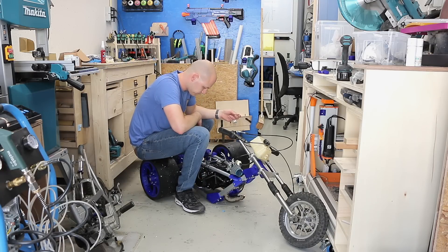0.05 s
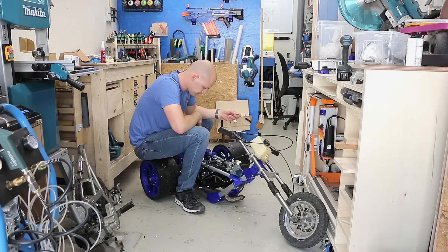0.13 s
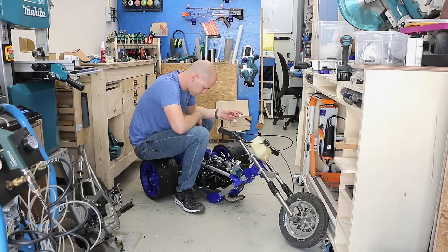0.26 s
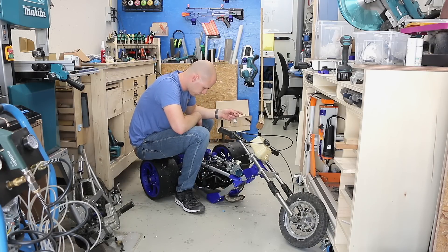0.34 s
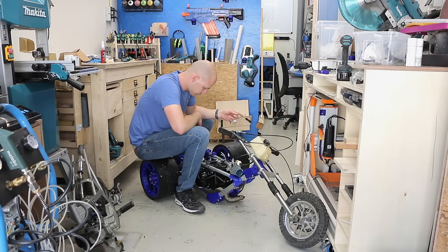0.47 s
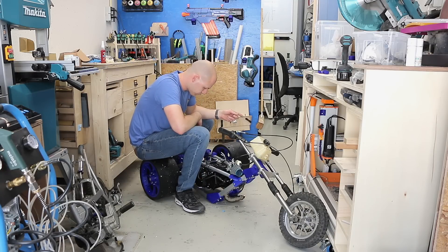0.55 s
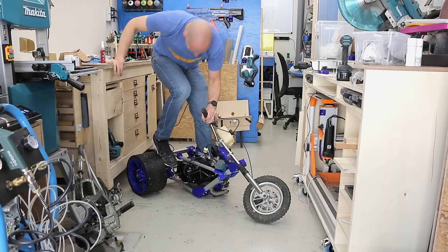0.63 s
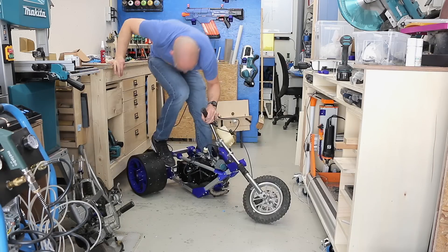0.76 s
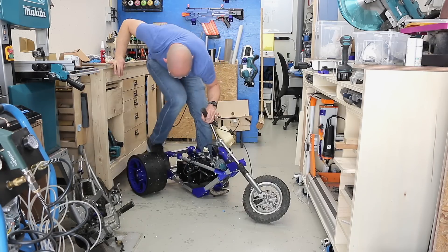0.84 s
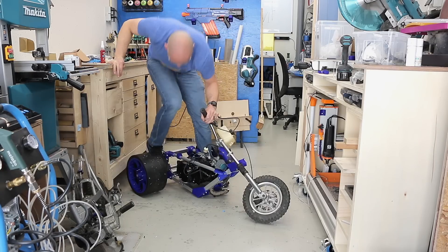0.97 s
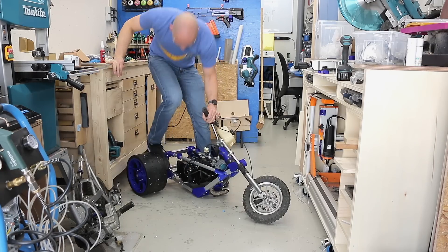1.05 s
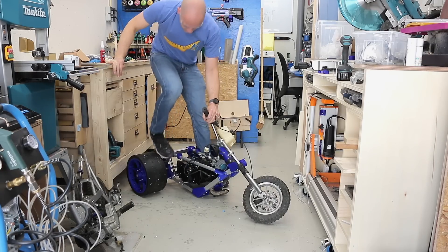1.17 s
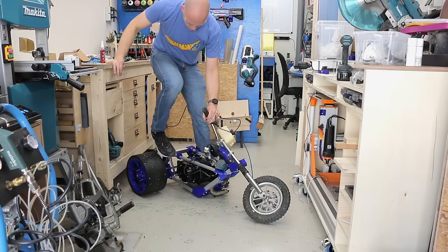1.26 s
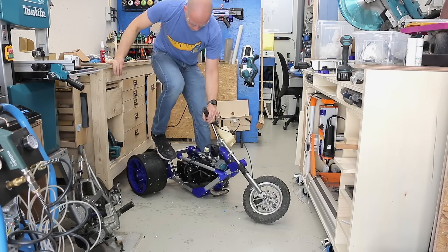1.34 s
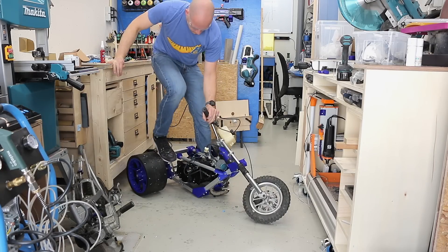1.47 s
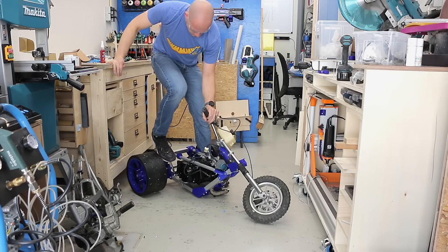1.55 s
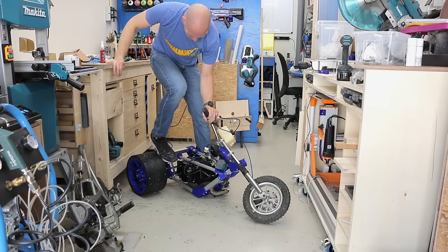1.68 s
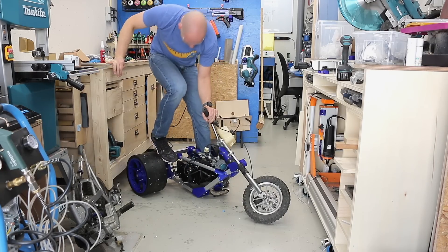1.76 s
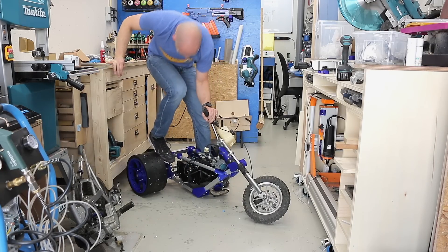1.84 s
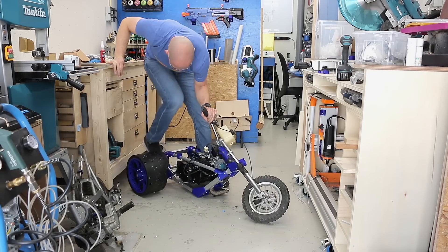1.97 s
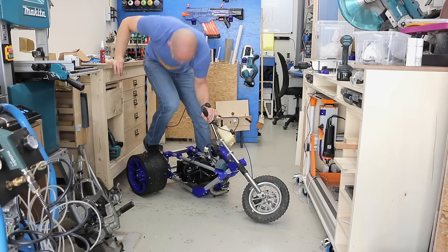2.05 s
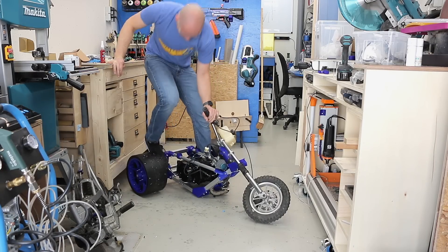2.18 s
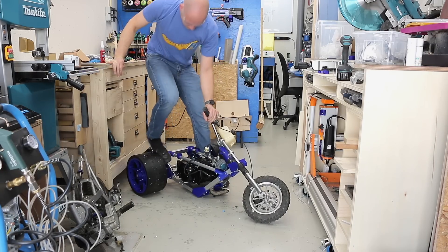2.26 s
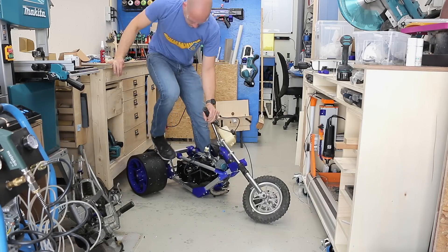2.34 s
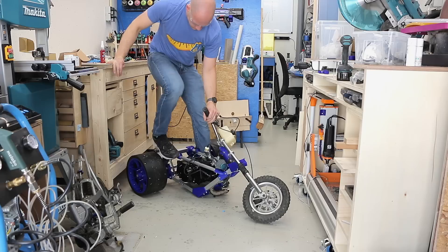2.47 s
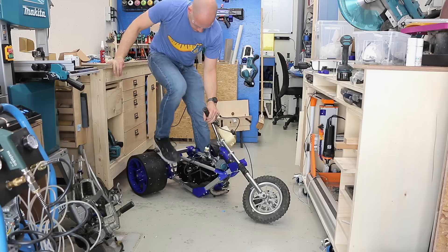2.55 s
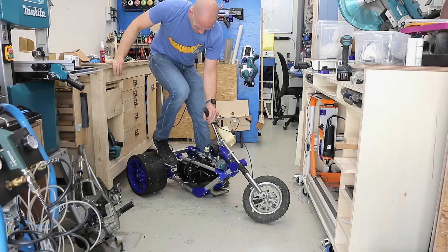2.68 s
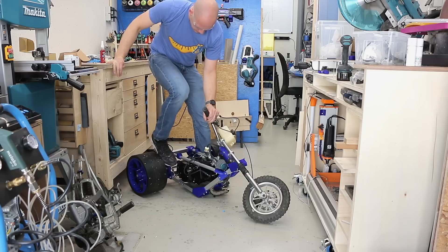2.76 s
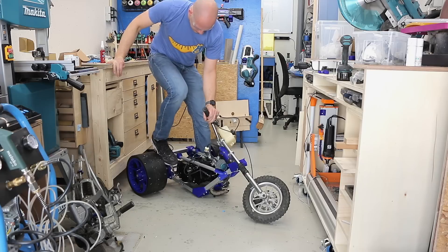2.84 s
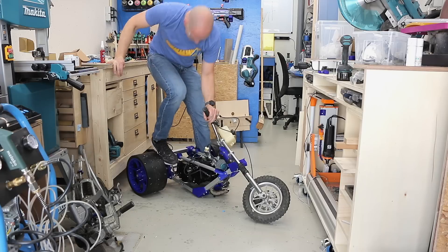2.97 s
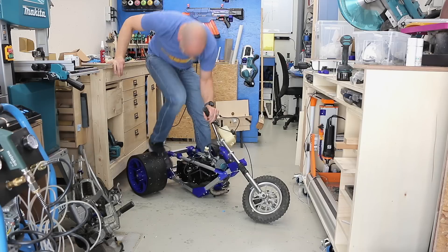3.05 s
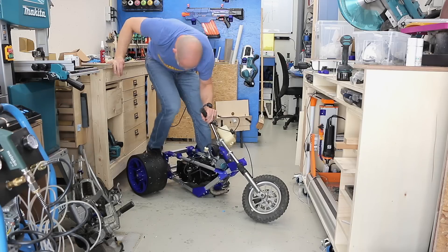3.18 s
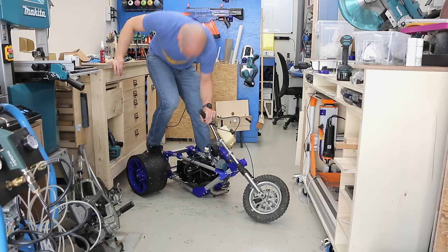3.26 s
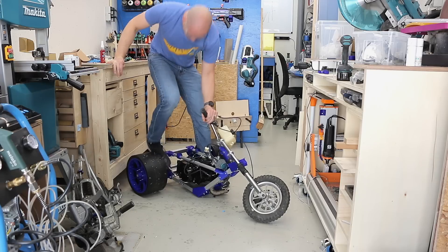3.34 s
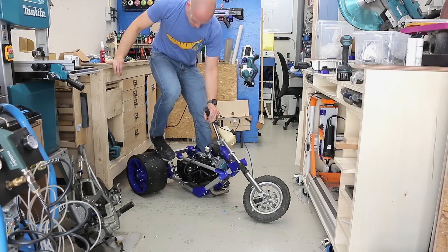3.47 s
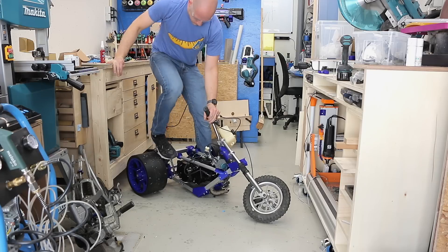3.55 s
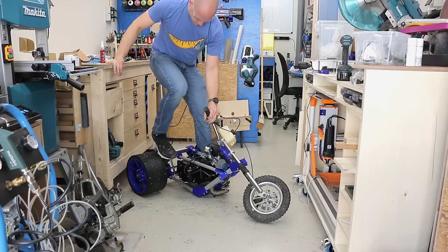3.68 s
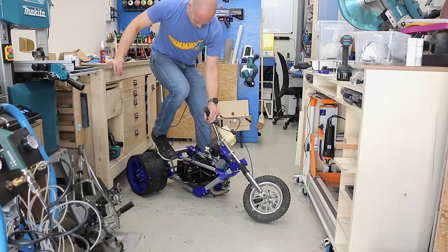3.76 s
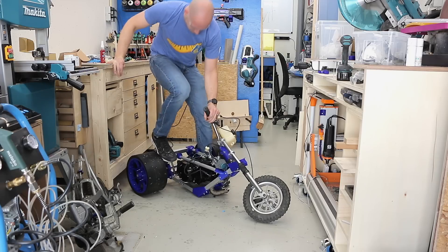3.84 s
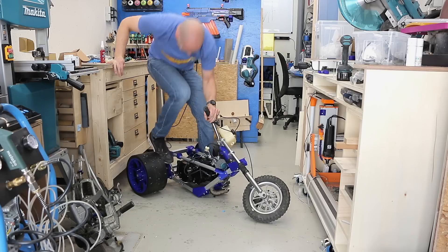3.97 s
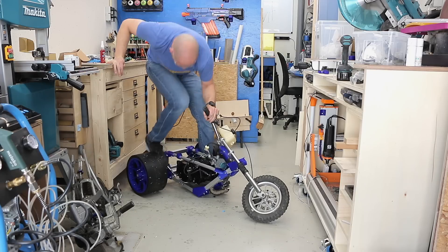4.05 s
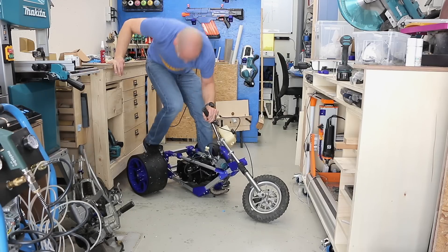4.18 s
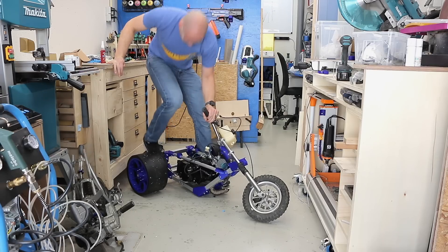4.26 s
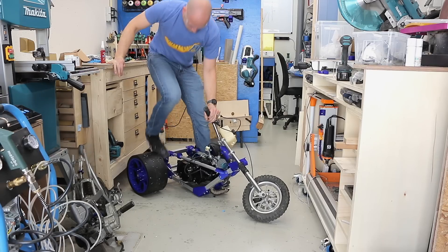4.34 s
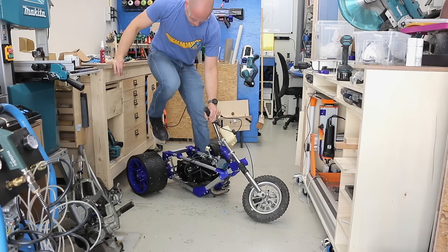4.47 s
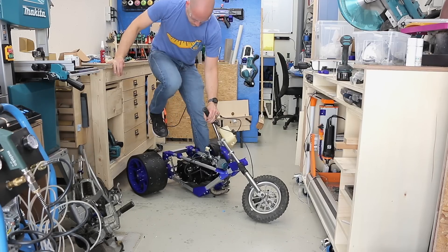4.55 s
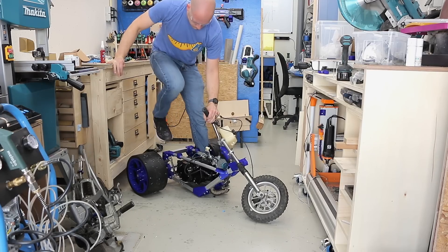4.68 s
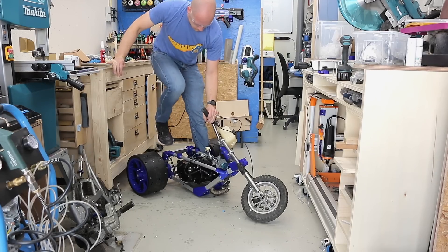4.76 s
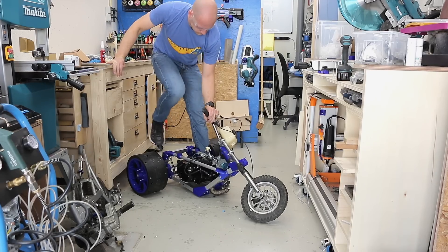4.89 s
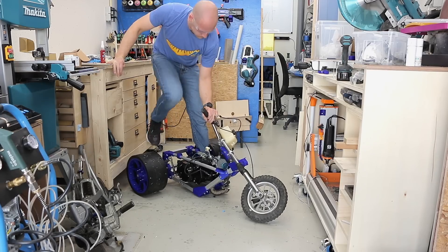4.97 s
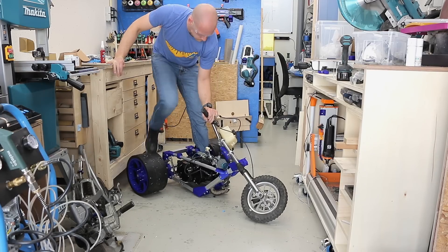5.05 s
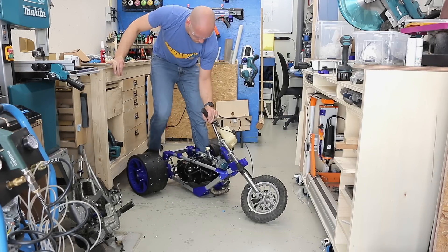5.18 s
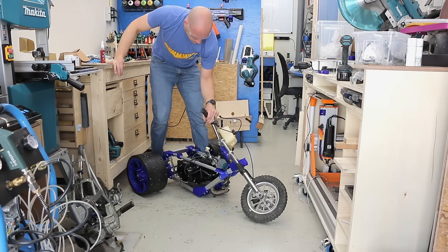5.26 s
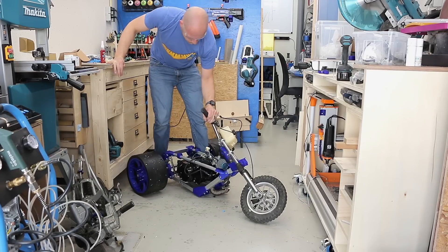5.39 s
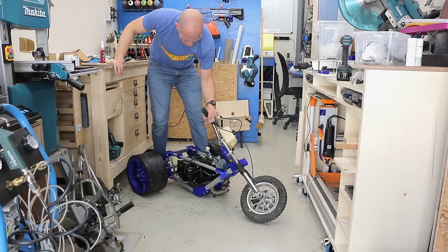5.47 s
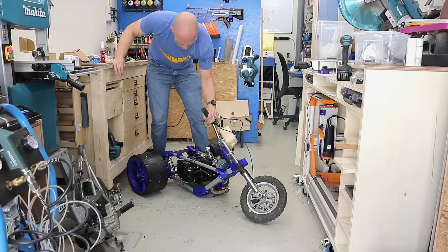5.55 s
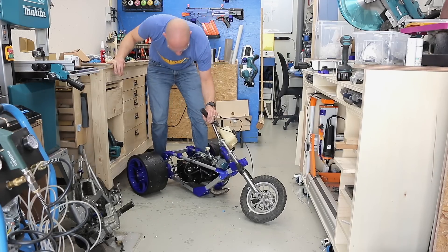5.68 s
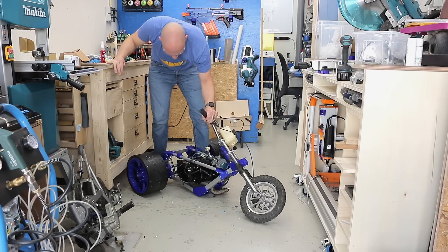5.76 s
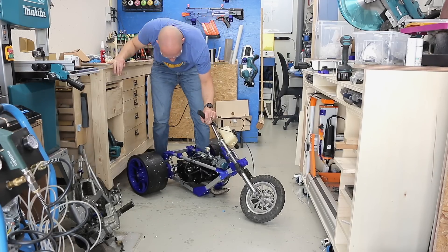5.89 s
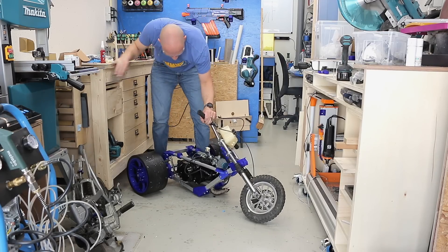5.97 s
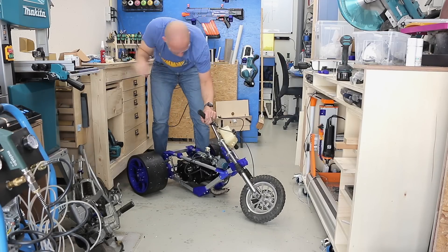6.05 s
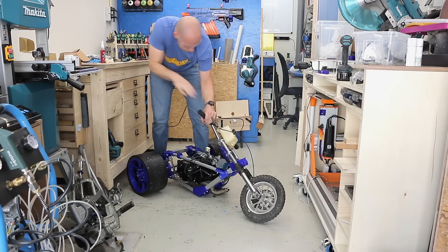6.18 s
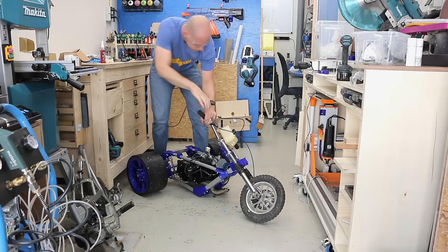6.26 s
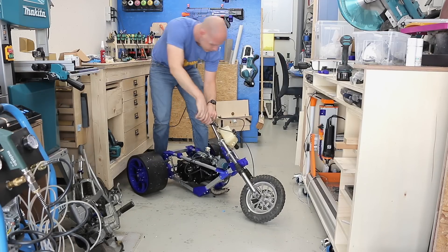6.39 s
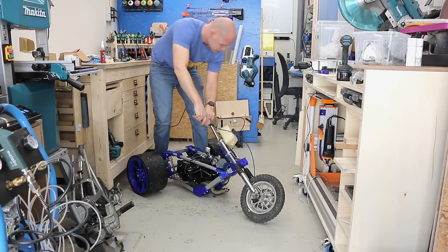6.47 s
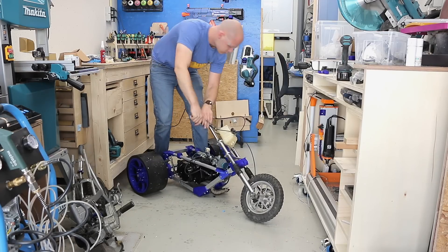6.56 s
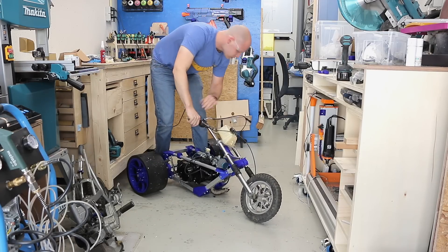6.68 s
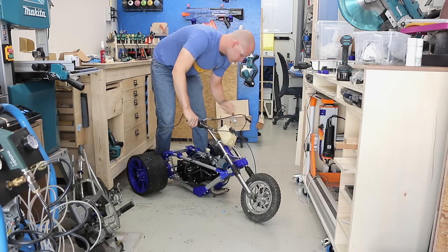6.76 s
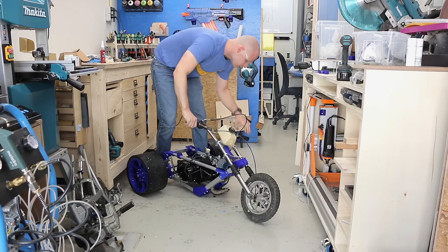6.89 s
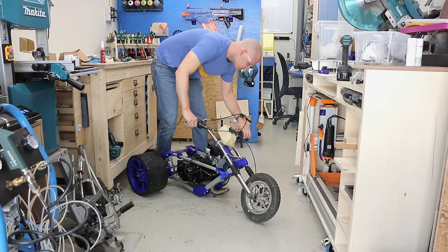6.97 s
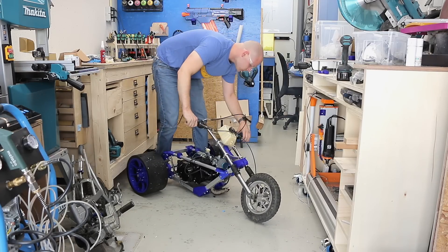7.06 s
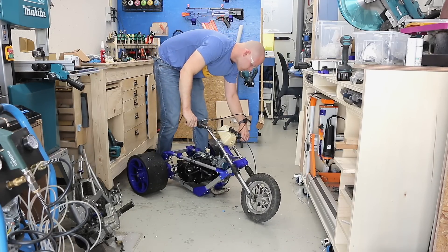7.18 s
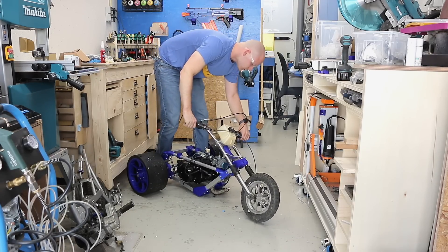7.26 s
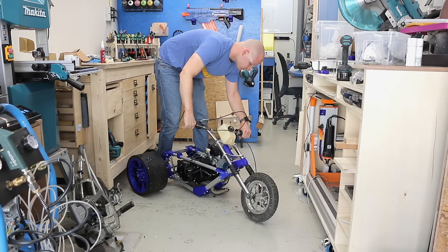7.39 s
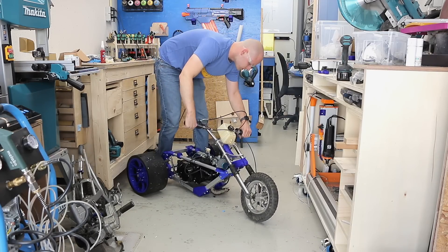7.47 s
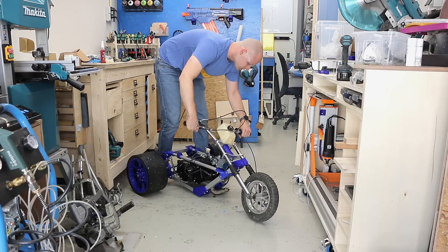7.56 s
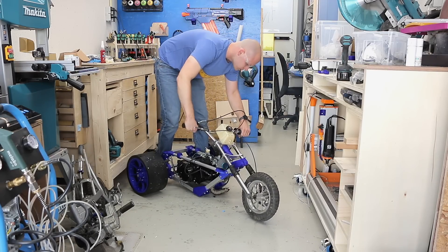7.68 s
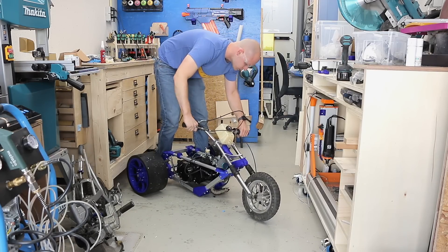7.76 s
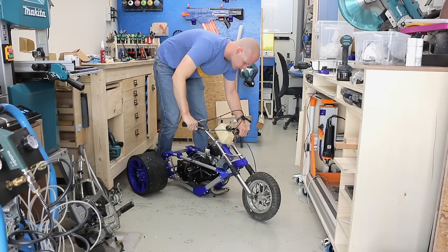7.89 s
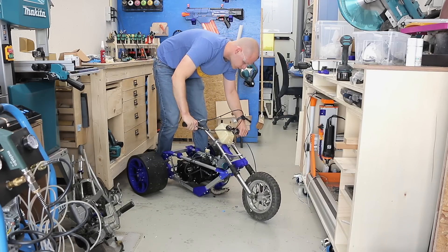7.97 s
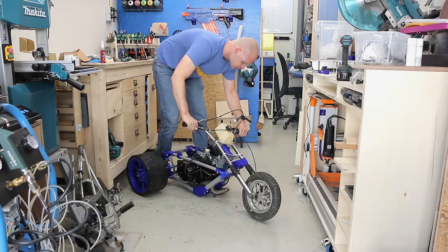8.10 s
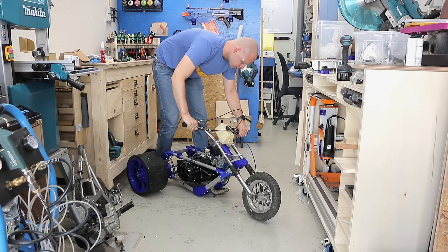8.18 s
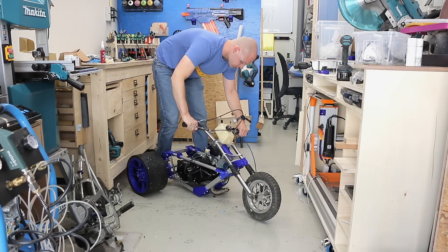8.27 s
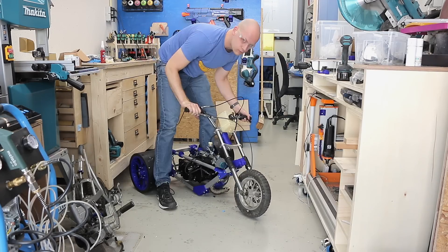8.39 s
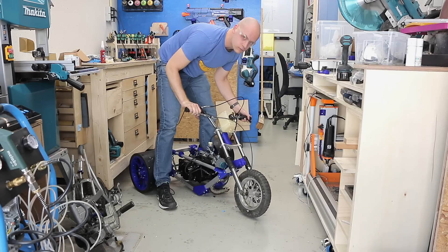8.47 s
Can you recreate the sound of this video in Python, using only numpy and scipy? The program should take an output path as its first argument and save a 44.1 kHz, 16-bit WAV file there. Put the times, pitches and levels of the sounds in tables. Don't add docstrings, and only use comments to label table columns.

```python
import sys
import numpy as np
from scipy import signal
from scipy.fft import rfft, irfft
from scipy.io import wavfile
from scipy.ndimage import uniform_filter1d

SR = 44100
rng = np.random.default_rng(int(sys.argv[2]) if len(sys.argv) > 2 else 0)


def persist_wave(psi):
    counts = np.round(np.clip(psi, -1, 1) * 32767).astype(np.int16)
    wavfile.write(sys.argv[1], SR, np.atleast_2d(counts).T)


def decibels_to_gain(level_db):
    exponent = np.asarray(level_db, float) / 20
    return 10 ** exponent


N = 376173
TIME = np.arange(N) / SR

# pitch_hz, level_db, t60_s
FRAME = [(781, 3, .18), (1008, 3, .3), (1147, 4, .28), (1440, -0.5, .28), (1580, 9, .25), (1700, 6.5, .27),
         (1853, 6.5, .21), (2200, 3, .24), (2965, -14, .2)]
# pitch_hz, width_hz, level_db
BRIGHT = [(4600, 250, -3), (5450, 190, -5), (6860, 230, -1), (7500, 200, -2), (8150, 350, -3.5),
          (9000, 500, -3), (12000, 6000, -15)]
# peak_s, gear_rattle_db, intake_rush_db, valve_hiss_db, rush_centre_hz
SWINGS = [(.91, -55, -43, -46, 3146), (.986, -14, -17, -32.5, 3236), (1.03, -35, -20.5, -27.5, 3941),
          (1.095, -26.5, -24.5, -29, 3820), (1.183, -41, -16, -23, 3957), (1.259, -17.5, -25, -34, 3620),
          (2.035, -29, -33.5, -49.5, 2875), (2.116, -17, -15.5, -46, 3136), (2.2, -28, -21, -33.5, 3210),
          (2.301, -27.5, -26.5, -28, 3606), (2.428, -25.5, -29.5, -35.5, 3088), (3.15, -35, -29, -56, 3775),
          (3.232, -15.5, -19, -50.5, 3187), (3.293, -19.5, -18.5, -27, 3443),
          (3.4, -28.5, -28.5, -34.5, 3450), (3.563, -22.5, -32, -44, 3214), (4.05, -47, -46, -90, 3450),
          (4.13, -39, -34, -51, 3820), (4.19, -30, -24.5, -49, 3130), (4.24, -20.5, -19.5, -24, 3460),
          (4.297, -24.5, -19, -34.5, 4010), (4.36, -35, -25.5, -22.5, 3850)]
# shut_s, reopened_s, rasp_loss_db, hiss_filter_steps_down
SHUTS = [
    (4.622, 4.898, -13.5, 0.32),
    (5.3, 5.627, -3, 0.21),
    (6.341, 6.732, -10.5, 0.86),
    (7.387, 7.881, -12, 3.5),
    (7.584, 7.79, -5.5, 0),
    (4.89, 5.097, 1, -1),
]


def in_time(spans, quiet):
    out = np.outer(quiet, np.ones(N))
    for rows in spans:
        s, *columns = np.transpose(rows)
        on = (TIME >= s[0]) & (TIME <= s[-1])
        out[:, on] = [np.interp(TIME[on], s, c) for c in columns]
    return out


def rms_one(x):
    return x / np.sqrt(np.mean(x ** 2) + 1e-20)


def at_hz(points, hz):
    points_hz, values = np.transpose(points)
    return np.interp(np.log(hz + 1), np.log(points_hz), values)


def band(x, low_hz, high_hz):
    return rms_one(signal.sosfilt(signal.butter(2, [low_hz, high_hz], "band", fs=SR, output="sos"), x))


def resonate(x, peaks):
    out = 0
    for k, (hz, width_hz, db) in enumerate(peaks):
        r = np.exp(-np.pi * abs(width_hz) / SR)
        poles = [1, -2 * r * np.cos(2 * np.pi * hz / SR), r * r]
        ring = signal.lfilter([(1 - r * r) / 2, 0, (r * r - 1) / 2], poles, x + 1e-18)
        out = out + (-1) ** k * decibels_to_gain(db) * ring
    return out


def grains(per_s, spread_db):
    size = decibels_to_gain(spread_db * np.minimum(rng.exponential(1, N), 5))
    return (rng.random(N) < per_s / SR) * rng.choice([-1, 1], N) * size


def coloured(spectrum):
    gain = decibels_to_gain(at_hz(spectrum, np.fft.rfftfreq(N, 1 / SR)))
    return rms_one(irfft(rfft(rng.standard_normal(N)) * gain, N))


def swells(s, db, rise_db_per_s, fall_db_per_s):
    late = TIME[::32] - np.array(s)[:, None]
    level = np.array(db)[:, None] - np.where(late < 0, -rise_db_per_s, fall_db_per_s) * late
    return np.interp(TIME, TIME[::32], decibels_to_gain(level.max(axis=0)))


def shutting(depths, sink_s, lag_s=0):
    reopen_s = 0.015
    out = np.zeros(N)
    for (shut, opened, *_), depth in zip(SHUTS, depths):
        sunk = 1 - np.exp(-np.maximum(TIME - shut - lag_s, 0) / sink_s)
        out += depth * sunk * np.clip((opened - TIME) / reopen_s + 1, 0, 1)
    return out


def room(x, wet_db):
    # pitch_hz, t60_s
    room_t60 = [(200, 0.35), (1000, 0.24), (4000, 0.05), (12000, 0.049)]
    t, tail = TIME[:SR // 2], 0
    for hz in np.geomspace(80, 14000, num=9):
        octave = band(rng.standard_normal(len(t)), hz / 1.38, hz * 1.38)
        tail = tail + octave * np.sqrt(hz) * decibels_to_gain(-60 * t / at_hz(room_t60, hz))
    tail = tail * np.minimum(t / 0.0067, 1)
    return x + decibels_to_gain(wet_db) * signal.fftconvolve(x, tail / np.sqrt(np.sum(tail ** 2)))[:N]


def ventilation():
    # pitch_hz, level_db
    vent = [(15, -40), (25, -10), (60, 8.5), (174, -5), (219, -2), (756, -14), (930, -15.5), (1970, -24),
            (12000, -49), (15600, -88), (22000, -120)]
    return decibels_to_gain(-43.5) * coloured(vent)


def workshop():
    # pitch_hz, level_db
    shop = [(35, -31.5), (60, -24.5), (139, 1.5), (712, -3), (5220, -19), (5670, -15.5), (6170, -18.5),
            (7150, -19), (9000, -23), (11700, -44.5), (19800, -120)]
    shop_db = -62
    rumble = decibels_to_gain(shop_db + 1.5) * band(rng.standard_normal(N), 25, 82)
    return decibels_to_gain(shop_db) * coloured(shop) + rumble


def squeaks():
    # start_s, pitch_hz, width_hz, level_db, length_s
    spring = [(0.69, 4300, 700, -60, 0.3), (0.695, 600, 250, -65, 0.06), (1.563, 4270, 700, -60, 0.06),
              (1.84, 7100, 150, -67, 0.09), (3.955, 4300, 600, -58, 0.05), (2.815, 7150, 150, -59, 0.13),
              (2.866, 5550, 150, -59, 0.1), (2.718, 4350, 700, -51, 0.045), (2.832, 7600, 300, -64, 0.04),
              (2.59, 6900, 600, -73, 0.15), (3.075, 3400, 300, -58, 0.07)]
    out, t = np.zeros(N), TIME[:SR // 4]
    for s, hz, width_hz, db, length in spring:
        swell = 3 * t / length * np.exp(1 - 3 * t / length)
        rub = resonate(rng.standard_normal(len(t)), [(hz, width_hz, 0)])
        whistle = rms_one(resonate(rub, [(hz, width_hz, 0)]))
        out[round(s * SR):][:len(t)] += decibels_to_gain(db) * swell * whistle
    return out


def knocks():
    # start_s, peak_db, thud_db, pitch_hz
    slams = [(0.898, -26, -43, 760), (0.936, -5, -24, 1030), (1.086, -16, -41.5, 830),
             (1.249, -1, -20.5, 1500), (1.991, -28.5, -40, 827), (2.102, -8.5, -47.5, 965),
             (2.422, -6, -37, 970), (3.129, -19.5, -34, 1760), (3.19, -12.5, -20.5, 1147),
             (3.212, -6, -28, 1048), (3.553, -5.5, -25.5, 980), (4.115, -29, -45, 2460),
             (4.148, -20.5, -39, 920)]
    # start_s, peak_db, tick_db, pitch_hz
    clicks = [(0.825, -34, -55.5, 1554), (1.032, -13, -9, 2060), (1.089, -17, -11, 2110),
              (1.172, -23.5, -8, 1840), (1.244, -46, -7.5, 1750), (2.069, -19, -21, 1130),
              (2.147, -14.5, -4.5, 1020), (2.182, -20, -6.5, 2230), (2.226, -17, -8.5, 1010),
              (2.269, -21, -7, 2200), (2.302, -24, -23, 1960), (2.417, -15.5, -32.5, 1780),
              (2.053, -22, -33.5, 2530), (2.427, -13, -35.5, 1000), (1.259, -10, -25, 1560),
              (3.176, -18, -26, 935), (3.119, -30, -34, 3430), (0.875, -33, -56.5, 1640),
              (0.966, -13, -45, 3170), (1.165, -24, -25, 4000), (3.294, -19.5, -28.5, 2320),
              (3.333, -18, -12, 2210), (3.386, -20, -28.5, 880), (3.484, -21.5, -35, 600),
              (3.541, -42, -26.5, 2200), (1.182, -21, -14.5, 4000), (2.027, -38, -34.5, 2000),
              (2.092, -12.5, -17, 3200), (2.406, -40, -22, 4200), (3.111, -47, -27.5, 3400),
              (3.401, -26, -22, 3400), (4.199, -14, -20, 3200), (4.227, -23, -10, 3500)]
    # start_s, peak_db, thud_db, pitch_hz
    taps = [(1.449, -31, -33.5, 1010), (1.572, -45, -62, 2190), (1.587, -44, -42.5, 555),
            (1.717, -27, -43.5, 960), (1.916, -40, -43, 650), (2.716, -45, -46, 2240),
            (2.722, -38, -43, 660), (3.773, -47.5, -57.5, 690), (3.995, -38.5, -69, 2190),
            (4.04, -36, -47, 2270)]
    # start_s, clank_db, thud_db, tick_db, t60_s, pitch_hz
    blows = [(s, db, thud, db - 24, 0.22, hz) for s, db, thud, hz in slams]
    blows += [(s, db, db - 18, tick, 0.18, hz) for s, db, tick, hz in clicks]
    blows += [(s, db, thud, db - 30, 0.13, hz) for s, db, thud, hz in taps]
    clank_top = signal.butter(2, 4800, fs=SR, output="sos")
    out, t = np.zeros(N + SR), TIME[:SR // 3]
    for s, db, thud_db, tick_db, t60, centre_hz in blows:
        rattle = rng.standard_normal((3, len(t))) * (decibels_to_gain(-60 * t / t60) + np.exp(-t / 0.0032))
        modes = [(hz, 90, d + rng.normal(0, 3)) for hz, d, ring_s in FRAME]
        clank = resonate(rattle[0], modes + [(centre_hz, 300, 9), (3900, 1400, -16)])
        clank = signal.sosfilt(clank_top, clank)
        hollow_hz = 455 * (1 + 0.099 * rng.normal())
        thud = resonate(rattle[1], [(hollow_hz, 70, 13.5), (332, 80, -9.5), (665, 83, -35.5), (90, 31, 8)])
        sharp = rattle[2] * (np.exp(-t / 0.003) + 0.25 * np.exp(-t / 0.035))
        tick = resonate(sharp, [(hz, w, d + rng.normal(0, 4)) for hz, w, d in BRIGHT])
        for peak_db, part in [(db - 3.5, clank), (thud_db + 4.0, thud), (tick_db - 11.5, tick)]:
            out[round(s * SR):][:len(t)] += decibels_to_gain(peak_db) * part / np.abs(part).max()
    return out[:N]


def strokes(column, offset_db, fall_db_per_s):
    # start_s, gear_rattle_db, intake_rush_db, valve_hiss_db
    jolt_rows = [(.83, -59, -44.5, -57.5), (0.869, -48.5, -54.5, -46), (1.45, -30, -38, -43.5),
                 (1.721, -45, -68, -86.5), (1.917, -44, -38, -57), (1.995, -52.5, -57.5, -48),
                 (2.712, -53.5, -42, -50), (3.125, -37, -26.5, -48.5), (3.452, -27.5, -30.5, -52),
                 (3.529, -37.5, -32, -45), (4.0, -60, -39.5, -81), (1.172, -30, -22, -31),
                 (2.069, -25.5, -28, -45.5), (3.19, -18, -29, -45), (3.211, -17.5, -17, -38),
                 (4.149, -26, -44, -46), (3.772, -56, -58, -70)]
    swings, jolts = np.transpose(SWINGS), np.transpose(jolt_rows)
    swung = swells(swings[0], swings[column], 587.5, fall_db_per_s)
    jolted = swells(jolts[0], jolts[column], 5998, fall_db_per_s)
    return decibels_to_gain(offset_db) * np.maximum(swung, jolted)


def kicks():
    # pitch_hz, width_hz, level_db
    pipe = [(67.5, 110, 0.5), (150, 23, 7.5), (198, 25, 6.5), (270, 13, 11), (348, 870, -1.5)]
    # peak_s, peak_db
    puffs = [(.938, -23), (.986, -24), (1.09, -15.5), (1.259, -31.5), (1.45, -44), (1.601, -56),
             (1.738, -62), (1.926, -50), (2.065, -33.5), (2.162, -27), (2.344, -21), (2.428, -45),
             (2.72, -66), (3.128, -44.5), (3.223, -15.5), (3.254, -29.5), (3.401, -19.5), (3.564, -29),
             (4.146, -33), (4.26, -11.5), (4.36, -14.5)]
    # peak_s, peak_db
    booms = [
        (.96, -30),
        (1.29, -31.5),
        (1.75, -48),
        (2.165, -24),
        (3.245, -24),
        (3.42, -51.5),
        (3.6, -42),
    ]
    rise_db_per_s, fall_db_per_s = 701, 222.5
    puff = band(resonate(grains(900, spread_db=3.5), pipe), 49, 420)
    boom = rms_one(resonate(puff, [(148, 26, 0)]))
    air = swells(*np.transpose(booms), rise_db_per_s, fall_db_per_s) * boom
    air += swells(*np.transpose(puffs), rise_db_per_s, fall_db_per_s) * decibels_to_gain(-5.5) * puff

    frame = [(650, 95, -9.5)] + [(hz, 170, db / 2) for hz, db, t60 in FRAME]
    gears = band(resonate(grains(2500, spread_db=4.0), frame), 450, 2000)
    gears *= strokes(column=1, offset_db=-4.0, fall_db_per_s=249)

    rush_hz = np.interp(TIME, *np.transpose(SWINGS)[::4])
    wobble = rms_one(signal.lfilter([1], np.poly([.94, .94]), rng.standard_normal((2, N))))
    turn = 2 * np.pi * np.cumsum(rush_hz) / SR
    draw = strokes(column=2, offset_db=6.0, fall_db_per_s=190)
    whistle = wobble[0] * np.cos(turn) + wobble[1] * np.sin(turn)
    whistle *= (draw / draw.max()) ** 0.29
    rush = 0.4 * whistle + 0.27 * band(grains(4000, spread_db=1.5), 1900, 4600)

    hiss = rms_one(resonate(grains(5000, spread_db=3.0), BRIGHT))
    hiss *= strokes(column=3, offset_db=-5.0, fall_db_per_s=266)
    return air + gears + draw * rush + hiss


def silencer(hz):
    # pitch_hz, width_hz, level_db
    waves = [(150, 25, -6.5), (206.4, 32, 2.5), (270, 47.6, -0.5), (313.7, 40, -1.5), (361, 32, 3),
             (415, 30, -12), (460, 35, -9.5), (548, 99, -2), (622, 42, -7), (825, 92, -21.5),
             (897, 130, -6)]
    # pitch_hz, width_hz, depth (0-1)
    nulls = [(173.8, 18, 1), (231.4, 27, 0.6), (392, 31, 0.6)]
    gain = decibels_to_gain(-22)
    for centre_hz, width_hz, db in waves:
        gain = gain + decibels_to_gain(db) / (1 + (2 * (hz - centre_hz) / width_hz) ** 4) ** .5
    for centre_hz, width_hz, depth in nulls:
        gain = gain * (1 - depth / (1 + (2 * (hz - centre_hz) / width_hz) ** 2))
    return gain


def engine():
    # time_s, firings_per_s
    speed = [(4.2, 21), (4.86, 21), (4.93, 39.5), (5.05, 42.4), (5.18, 40), (5.33, 43.3), (5.51, 39.7),
             (5.77, 39.5), (6.08, 48.5), (6.22, 51.6), (6.35, 52.4), (6.705, 36.4), (7.08, 51.2),
             (7.26, 54.5), (7.42, 55.9), (7.858, 34.4), (8.13, 51), (8.344, 57.2)]
    # time_s, firings_per_s
    full_speed = [
        (8.344, 89.9),
        (8.54, 89.9),
    ]
    # time_s, exhaust_db
    exhaust = [(4.2, -45.5), (4.244, -29), (4.326, -49.5), (4.385, -21.5), (4.4, -9.5), (4.466, -9.5),
               (4.62, -13.5), (4.66, -24), (4.8, -20.5), (4.83, -28), (4.89, -32.5), (4.94, -17.5),
               (6.7, -15.5), (7.4, -15.5), (7.5, -8), (7.89, -10), (8.0, -14), (8.343, -1.5)]
    # time_s, exhaust_db, rasp_db
    full_revs = [
        (8.344, 6, -27),
        (8.54, -25, -28),
    ]
    # multiple of the firing rate, revving_db, full_revs_db
    orders = [(1, -5, -16), (2, -5.5, -18), (3, -4, -6.5), (4, -2.5, -13.5), (5, 0, -12.5), (6, 2, -4.5),
              (7, 1, 4), (8, -2.5, -6), (9, -6, -9), (10, 0.5, -3), (11, 1, -18.5), (12, -3.5, -9.5),
              (13, -4, -13), (14, -6.5, -16.5), (15, -8, -9.5), (16, -3, -7.5), (17, -6.5, -19.5),
              (18, -3, -24.5), (19, -7, -15), (20, -6, -9)]
    # pitch_hz, width_hz, level_db
    rasp_peaks = [(1020, 424, 4.5), (2440, 940, 1.5), (3820, 1210, 2.5), (8800, 23000, -15)]
    per_s, = in_time([speed, full_speed], [30])
    level_db, = in_time([exhaust, [row[:2] for row in full_revs]], [-130])
    full = TIME > full_speed[0][0]
    over_db = np.interp(TIME, [4.93, 4.98], [6, 15])
    cycle = np.cumsum(per_s) / SR
    luck = rng.standard_normal((400, len(orders) + 2))

    rasp_db = -26.5 + 0.37 * (np.maximum(per_s, 36) - 45)
    rasp_db += shutting([row[2] for row in SHUTS], sink_s=0.061)
    rasp_db += np.clip(np.where(TIME < 4.9, -10, -18) - level_db, 0, 16)
    rasp_db = np.where(full, in_time([full_revs], [0, 0])[1], rasp_db)
    throttle = decibels_to_gain(-5.0 + 0.78 * (rasp_db + 24.5))

    cold = np.interp(TIME, [5.5, 5.7], [2.5, 1])
    late = 0.035 * (cold - .8) / 1.7
    turn = cycle + late * np.interp(cycle, np.arange(400), luck[:, -2])

    upper_db = -15.5 * shutting([0.2, 0.077, 0.63, 0.88, 0.1, 0.14], sink_s=0.0091, lag_s=0.062)[::16]
    top_db = 0.2 * (per_s[::16] - 53)
    chill_db = -6 * np.interp(TIME[::16], [5.05, 5.15], [1, 0])
    note = 0
    for k, (multiple, db, full_db) in enumerate(orders):
        chance = np.interp(cycle, np.arange(400), luck[:, k] + 0.13 * luck[:, -1])
        uneven = 1.52 * np.where(full, .4, cold) * chance
        hz = multiple * per_s[::16]
        box_db = db + upper_db * np.clip((hz - 314.5) / 40, 0, 1)
        box_db = box_db + top_db * (hz > 435) + chill_db * (abs(hz - 275) < 40)
        box = np.repeat(silencer(hz) * decibels_to_gain(box_db), 16)[:N]
        sweep = -0.85 * k * k
        wave = np.sin(2 * np.pi * multiple * turn + sweep + 0.14 * uneven)
        note = note + np.where(full, decibels_to_gain(full_db), box) * decibels_to_gain(uneven) * wave

    gate = 0.12
    firing = cycle.astype(int)
    shifted = cycle + 0.57 * luck[firing, -2]
    burst = (1 - gate + gate * np.cos(np.pi * shifted) ** 2) * decibels_to_gain(1.3 * luck[firing, -1])
    rasp = rms_one(resonate(rng.standard_normal(N), rasp_peaks) * burst)
    clatter = band(grains(3100, spread_db=-4.5), 650, 4000)
    return decibels_to_gain(level_db + over_db) * (rms_one(note) + throttle * rasp + decibels_to_gain(-35.5) * clatter)


def coughs():
    # start_s, peak_db, pitch_hz, length_s, low_ring_db
    firings = [(4.394, -9.5, 316, 0.032, -4), (4.435, -8, 307, .025, -5), (4.486, -10.5, 302, 0.028, -6),
               (4.529, -11.5, 307, .025, -4), (4.586, -8, 328, 0.029, -6.5), (4.625, -5, 270, 0.053, -13),
               (4.673, -13, 249, 0.019, -12), (4.728, -3.5, 270, 0.047, -14), (4.771, -6.5, 242, .034, -11),
               (4.838, -9.5, 230, 0.019, -20.5), (4.944, -13, 338, .03, -10)]
    out, t = np.zeros(N), TIME[:SR // 5]
    for s, db, hz, length, ring_db in firings:
        chirp = np.sin(2 * np.pi * hz * t * (.8 + 7.0 * t)) * np.exp(-(t / length) ** 4.0)
        ring = np.sin(2 * np.pi * 197.8 * t) * np.exp(-(t / (1.1 * length)) ** 2)
        out[round(s * SR):][:len(t)] += decibels_to_gain(db) * chirp + decibels_to_gain(ring_db) * ring
    return out


def scene():
    motor = room(engine() + coughs(), wet_db=-16)
    metal = room(knocks(), wet_db=-10.5) + room(kicks() + squeaks(), wet_db=-26.0)
    return np.tile(metal + motor + workshop(), (2, 1))


def hiss_gate(x, shut_db, open_db, leak_db):
    gate_hz = [4700, 7000, 10000]
    steps = [signal.sosfiltfilt(signal.butter(4, hz, fs=SR, output="sos"), x) for hz in gate_hz] + [x]
    treble_db = 10 * np.log10(uniform_filter1d((x - steps[0]) ** 2, size=600) + 1e-14)
    place = len(gate_hz) * np.clip((treble_db - shut_db) / (open_db - shut_db), 0, 1)
    flutter = 1 + 0.15 * np.interp(TIME * 45, np.arange(400), rng.standard_normal(400))
    sunk = flutter * shutting([row[3] for row in SHUTS], sink_s=0.17)
    place = np.clip(len(gate_hz) - sunk, 0, place)
    slid = sum(np.maximum(1 - abs(place - k), 0) * step for k, step in enumerate(steps))
    return slid + decibels_to_gain(leak_db) * (x - slid)


def roll_off(x):
    return signal.sosfilt(signal.butter(12, 15850, fs=SR, output="sos"), x)


def record(dry):
    # start_s, input_ceiling_db, fade_in_s
    scenes = [
        (0, 1, 0.00081),
        (0.669, -5.5, 0.078),
        (3.922, -11, 0.11),
        (8.343, -19, 0.056),
    ]
    scenes = np.array(scenes)
    start, ceiling_db, fade = scenes[np.searchsorted(scenes[:, 0], TIME, "right") - 1].T
    squared = np.clip(dry[0], -decibels_to_gain(ceiling_db), decibels_to_gain(ceiling_db))
    mix = signal.sosfilt(signal.butter(2, 142, "high", fs=SR, output="sos"), squared)
    mix = hiss_gate(mix, shut_db=-68, open_db=-40, leak_db=-19)
    mix = np.where(start > 0, mix, ventilation())
    mix = mix * np.clip((TIME - start) / fade, .002, 1) ** 1.84

    stray = np.repeat(rng.random(N // 1024 + 1) < 0.08, 1024)[:N]
    stray = np.roll(stray, 670) * (TIME > 4.4)
    treble_band = signal.butter(2, [2500, 9000], "band", fs=SR, output="sos")
    treble = signal.sosfilt(treble_band, mix * rng.choice([-1, 1], N))
    mix = mix + decibels_to_gain(-21) * stray * treble * [[1], [-1]]
    mix = signal.sosfilt(signal.ellip(10, .5, 70, 15750, fs=SR, output="sos"), mix)
    return roll_off(mix)


dry = scene()
out = record(dry)
persist_wave(out)
```